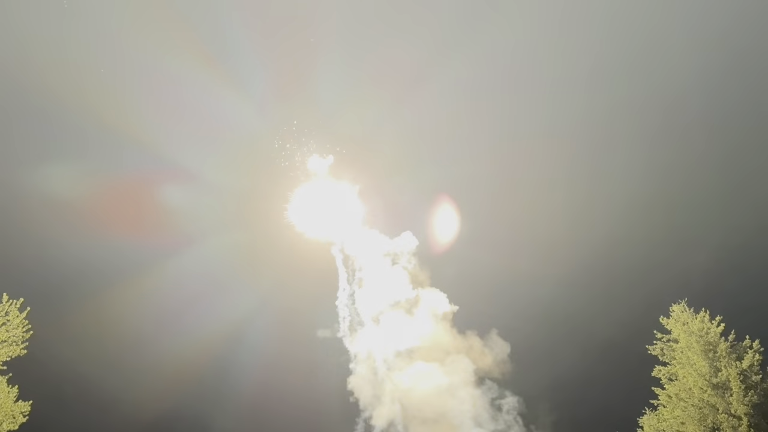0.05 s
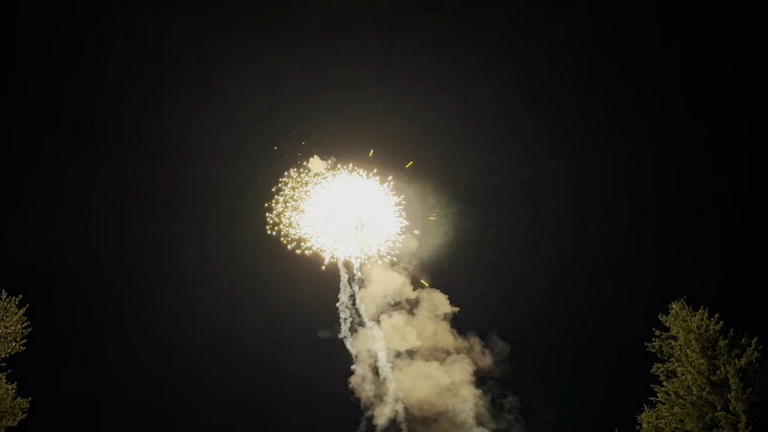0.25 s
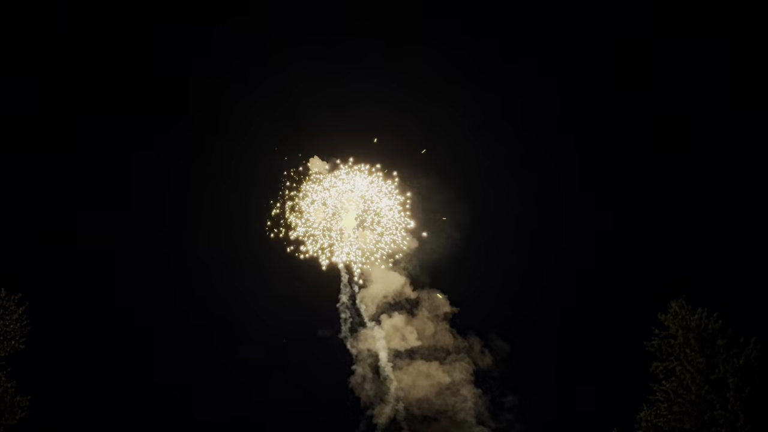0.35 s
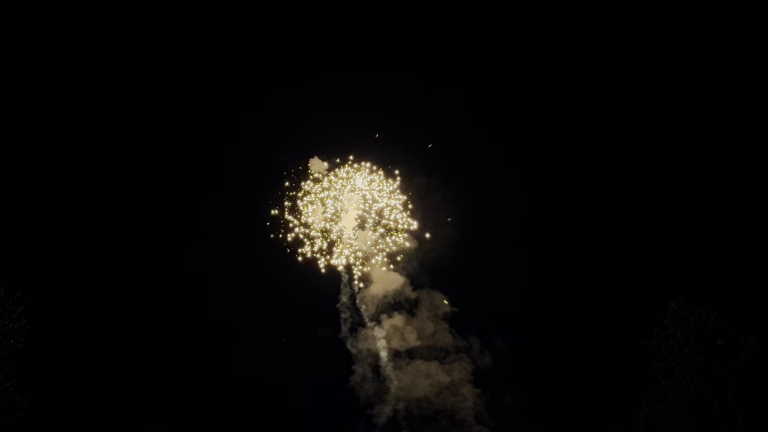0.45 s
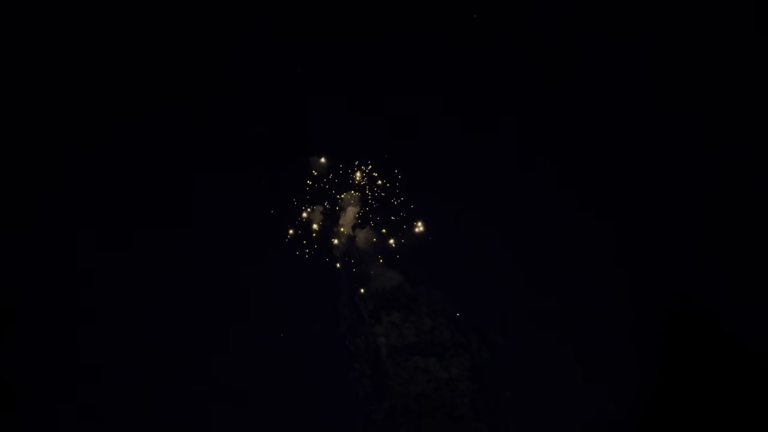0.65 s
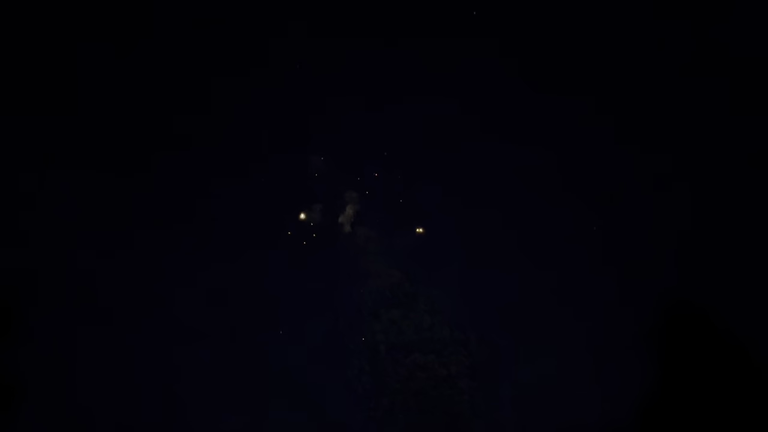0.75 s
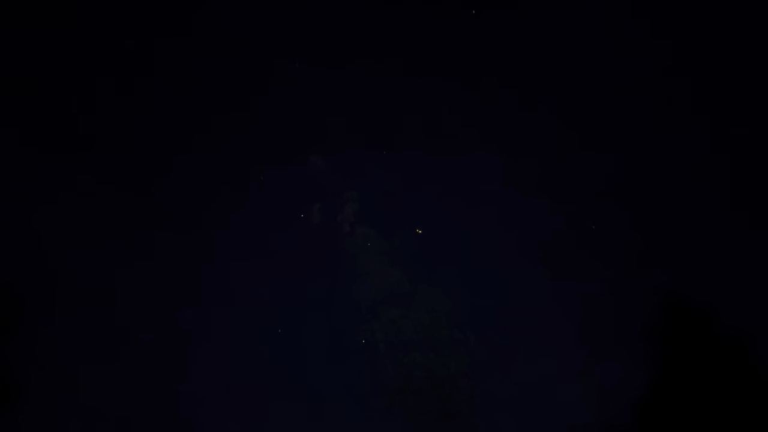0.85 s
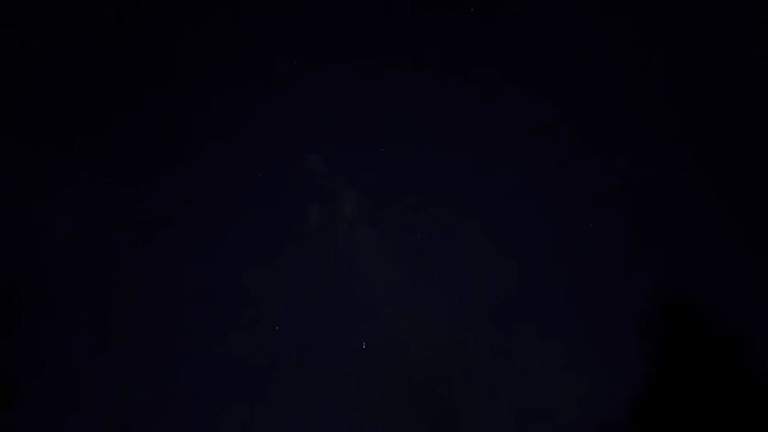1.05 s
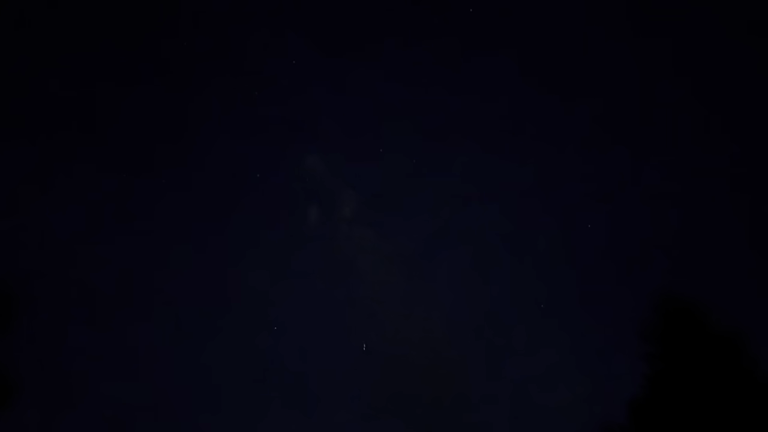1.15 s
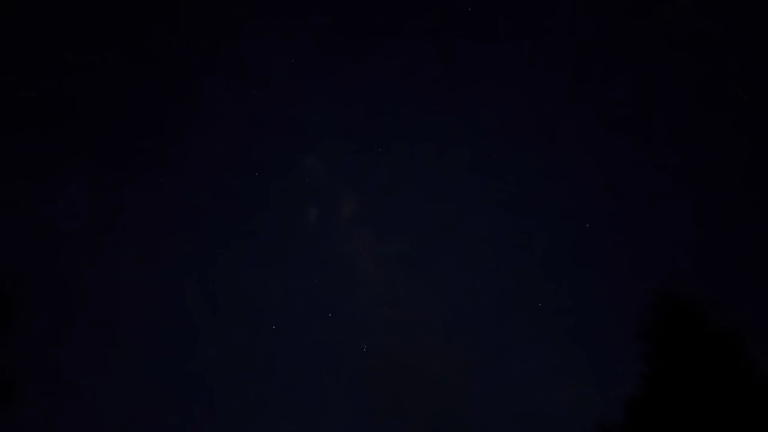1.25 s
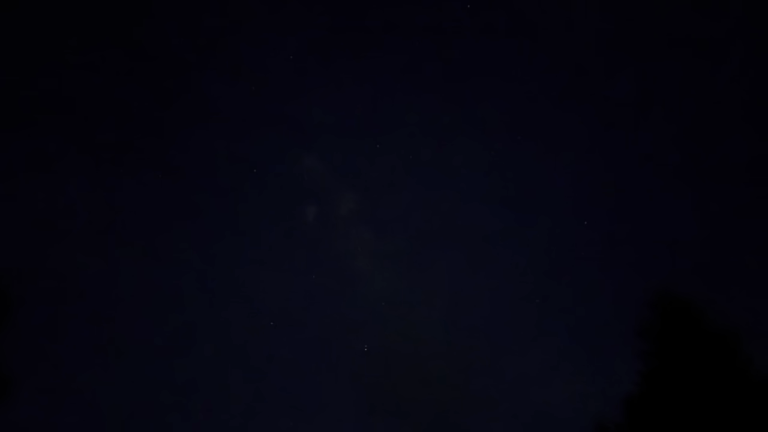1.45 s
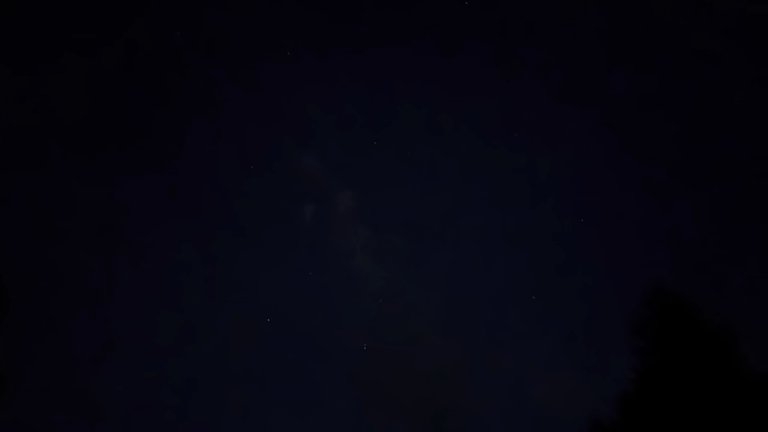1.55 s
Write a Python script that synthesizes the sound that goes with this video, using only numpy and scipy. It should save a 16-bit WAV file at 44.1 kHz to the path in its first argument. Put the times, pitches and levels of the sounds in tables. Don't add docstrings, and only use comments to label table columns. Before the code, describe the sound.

Two firework shells bang sharply overhead almost at once, then echo into a fading rumble

```python
import sys
import numpy as np
from scipy import signal
from scipy.fft import rfft, irfft, next_fast_len
from scipy.io import wavfile
from scipy.ndimage import uniform_filter1d

SR = 44100
rng = np.random.default_rng(int(sys.argv[2]) if len(sys.argv) > 2 else 0)


def wrap_up_sound(samples):
    columns = np.atleast_2d(samples).T
    tamed = np.clip(columns, -1, 1)
    steps = np.round(tamed * 32767).astype(np.int16)
    wavfile.write(sys.argv[1], SR, steps)


def ratio(d):
    e = np.asarray(d, float) / 20
    return 10 ** e


N = 70560
FFT_SIZE = next_fast_len(N + 8192)
HZ = np.arange(FFT_SIZE // 2 + 1) * SR / FFT_SIZE
LEFT_RIGHT = np.array([[1], [-1]])


def to_spectrum(x):
    return rfft(x, FFT_SIZE)


def to_samples(spectrum):
    return irfft(spectrum, FFT_SIZE)[..., :N]


def curve(rows, hz):
    corner_hz, value = np.transpose(rows)
    return np.interp(np.log(hz), np.log(corner_hz), value)


def delay(seconds):
    return np.exp(-2j * np.pi * HZ * seconds)


def low_pass(hz, order):
    return (1 + 1j * HZ / hz) ** -order


def high_pass(hz):
    return 1 - low_pass(hz, order=1)


def sides(pan_db):
    return ratio(pan_db / 2 * LEFT_RIGHT)


def crack(length_s):
    pulse = length_s * SR * np.sinc(HZ * length_s) * delay(length_s / 2)
    return pulse * high_pass(550) ** 2


def body(centre_hz):
    w = 1j * HZ / centre_hz
    swing = SR / centre_hz * w ** 2 / (1 + w) ** 4
    return swing / np.sqrt(1 + (HZ / 2000) ** 8)


def boom():
    push_s, top_hz, low_hz = 0.0014, 360.6, 55
    w = 2j * np.pi * HZ * push_s
    below_top = 1 / np.sqrt(1 + (HZ / top_hz) ** 12)
    above_low = 1 / np.sqrt(1 + (low_hz / (HZ + 1)) ** 6)
    return -push_s * SR * w / (1 + w) ** 2 * below_top * above_low


CRACK_DB, BOOM_DB = -1, 4.5
SHELL_START = [.2214, .28045]
# columns crack_db, boom_db, boom_pan_db [left over right]
SHELL_LEVELS = [
    (0, -0.5, 9.5),
    (0, 6, 0.8),
]
# columns delay_s [after the crack], level_db, pitch_hz, pan_db [left over right]
SHELL_BODY = [(0.00032, 4, 880, -6), (0.0001, 1, 1100, -1)]
# columns left_s, right_s
SHELL_BOOM_LATE = [(0, -.0004), (.0008, .0009)]
SHELL_CRACK_LENGTH = [.00034, .00031]


def bursts():
    ground_s = 0.00894
    crack_pan = sides(-4 / (1 + (HZ / 2500) ** 4))
    crack_ground = 1 + ratio(-16) * high_pass(1213) * delay(ground_s)
    boom_ground = 1 + HZ / np.hypot(HZ, 90) * delay(ground_s)
    out = 0
    shells = zip(SHELL_START, SHELL_LEVELS, SHELL_BODY, SHELL_BOOM_LATE, SHELL_CRACK_LENGTH)
    for start_s, levels, body_row, boom_late_s, length_s in shells:
        crack_db, boom_db, boom_pan_db = levels
        body_delay_s, body_db, body_hz, body_pan_db = body_row
        shock = ratio(crack_db) * crack(length_s) * low_pass(14630, order=1) * crack_pan
        swing = ratio(body_db) * body(body_hz) * delay(body_delay_s) * sides(body_pan_db)
        sharp = (shock + swing) * crack_ground
        deep = boom() * boom_ground * delay(np.array(boom_late_s)[:, None]) * sides(boom_pan_db)
        out = out + delay(start_s) * (ratio(CRACK_DB) * sharp + ratio(BOOM_DB + boom_db) * deep)
    return to_samples(out)


# columns start_s, level_db
WALL_SLAPS = [(0.1879, -28), (0.3211, -24), (0.4662, -31), (0.5186, -29), (0.5665, -34), (0.6842, -35),
              (0.7326, -39), (0.7546, -37), (0.827, -38), (0.848, -39), (0.8833, -39), (0.9601, -44)]


def wall_slaps():
    slap = crack(0.00066) * low_pass(3500, order=4)
    pans_db = 4 * rng.standard_normal(len(WALL_SLAPS))
    out = 0
    for (start_s, level_db), pan_db in zip(WALL_SLAPS, pans_db):
        out = out + delay(start_s) * ratio(level_db) * slap * sides(pan_db)
    return to_samples(out)


# columns start_s, level_db
DEEP_THUDS = [
    (0.032, -9),
    (.075, -18.5),
    (0.493, -8),
    (0.633, -14.5),
    (0.778, -32),
]


def deep_thuds():
    thud = boom() * high_pass(140) ** 2
    return to_samples(sum(delay(start_s) * ratio(level_db + BOOM_DB) * thud for start_s, level_db in DEEP_THUDS))


def random_walk(rate_hz):
    hold = int(SR / rate_hz)
    steps = np.repeat(rng.standard_normal(N // hold + 1), hold)
    return 1.5 * uniform_filter1d(uniform_filter1d(steps, hold), hold)[:N]


# columns age_s [after a burst], level_db
LANDSCAPE = [(.006, -34), (.011, 5), (.07, -7), (.2, -3.5), (.33, -9), (.48, -7), (.62, -10), (.85, -19),
             (1.35, -27.5)]


def scatter_power(age, hz, burst_db):
    land = np.interp(age, *np.array(LANDSCAPE).T, left=-200)
    land = land - 12 * np.clip(age - LANDSCAPE[-1][0], 0, 9)
    air_loss = 3.5 * (hz / 1000) ** 1.16 * np.abs(age) ** 0.85
    land_gain = ratio(burst_db + land - air_loss)

    leaf_t60_s, leaf_air_db_per_s = 1.1, 0.15
    leaf = 4.5 - (60 / leaf_t60_s + leaf_air_db_per_s * (hz / 1000) ** 2) * age
    leaf = leaf + np.interp(age, [0, .008, .01], [-9, -14, 0], left=-300)
    leaf_gain = ratio(burst_db + leaf) / (1 + (5200 / hz) ** 2)

    roll_t60_s = 1
    roll = 12 - 60 * age / roll_t60_s + np.interp(age, [0, .02], [-30, 0], left=-300)
    roll_gain = ratio(burst_db + roll) / (1 + (hz / 110) ** 3)
    return land_gain ** 2 + leaf_gain ** 2 + roll_gain ** 2


# columns start_s, level_db
RUMBLE_BURSTS = [
    (-.23, 7),
    (0.2197, 5.5),
    (0.281, 3.5),
]
# columns pitch_hz, density_db [dB per Hz]
RUMBLE_COLOUR = [(30, -47.5), (70, -7.5), (250, -1.5), (420, -9), (1400, -15.5), (3000, -24), (8500, -28.5),
                 (16000, -37.5)]
# columns pitch_hz, likeness [0-1]
RUMBLE_ALIKE = [(60, .95), (300, 0.7), (700, .55), (1400, 0), (2500, 0.4), (7000, 0.2)]


def rumble():
    t = np.arange(0, N, 32) / SR
    lumps = random_walk(45)
    grains = rng.standard_normal((2, N)) * ratio(1.3 * (rng.exponential(size=(2, N)) - 1))
    source = to_spectrum(grains / grains.std()) * ratio(curve(RUMBLE_COLOUR, HZ + 1))
    octave = np.log2(HZ + 1)
    out = 0
    for centre in np.arange(4.5, 14.3, 1 / 3):
        hz = 2 ** centre
        mid, side = to_samples(source * np.clip(1 - 3 * abs(octave - centre), 0, 1))
        power = 1e-20
        for start_s, level_db in RUMBLE_BURSTS:
            power = power + scatter_power(t - start_s, hz, level_db)
        unsteady_db = lumps / (1 + hz / 4000) + random_walk(18.04)
        gain = np.interp(np.arange(N) / SR, t, np.sqrt(power)) * ratio(unsteady_db)
        alike = np.clip(curve(RUMBLE_ALIKE, hz), 0, 1)
        out = out + gain * (np.sqrt(1 + alike) * mid + np.sqrt(1 - alike) * side * LEFT_RIGHT)
    return out * ratio(-31.5 + 17.5)


def night_air():
    noise = to_spectrum(rng.standard_normal((2, N)))
    return ratio(-60.5) * to_samples(noise * low_pass(900, order=2))


def hiss():
    return ratio(-99) * rng.standard_normal((2, N))


def scene():
    air = night_air()
    return bursts() + wall_slaps() + deep_thuds() + rumble() + air + hiss()


def band_limit(x):
    return signal.sosfilt(signal.butter(12, 16530, fs=SR, output="sos"), x)


def record(dry):
    split_hz, left_late_s = 7950, .000317
    spread_s, spread_power, knee_khz = .00085, 1.8, .12
    k, p = HZ / 1000 + knee_khz, 1 - spread_power
    spread = np.exp(-2j * np.pi * spread_s * 1000 * (k ** p / p - k * 8 ** -spread_power))
    lead_rad = 0.48 * np.clip(HZ / 1000, 0, 1) * np.clip((split_hz - HZ) / 2500, 0, 1)
    lag_rad = -2 * np.pi * left_late_s * (HZ - split_hz)
    lead = np.where(HZ < split_hz, lead_rad, lag_rad)
    x = to_spectrum(dry)
    x = np.where(HZ < split_hz - 400, x, x.mean(axis=0))
    x = x * np.exp(.5j * lead * LEFT_RIGHT)
    top = 1 / (1 + (HZ / 16200) ** 40)
    return band_limit(to_samples(x * spread * top))


dry = scene()
out = record(dry)
wrap_up_sound(out)
```